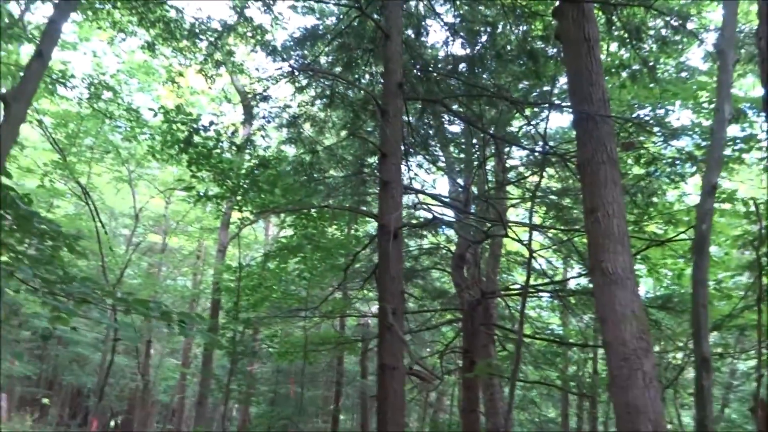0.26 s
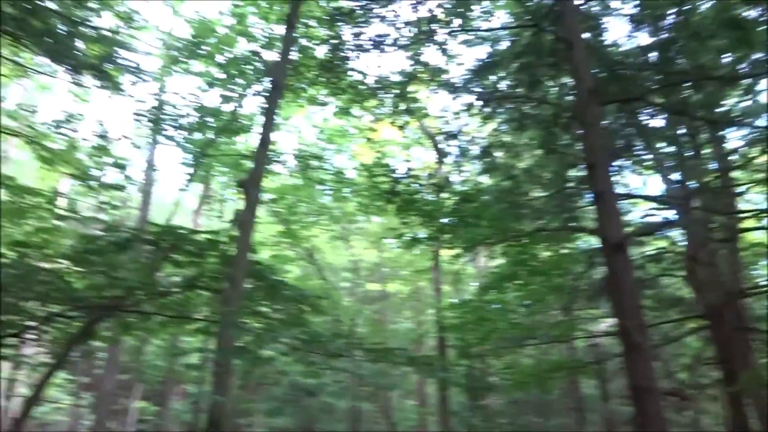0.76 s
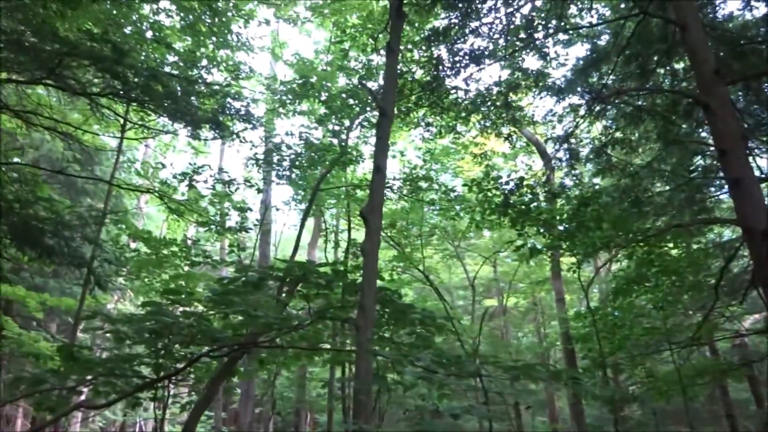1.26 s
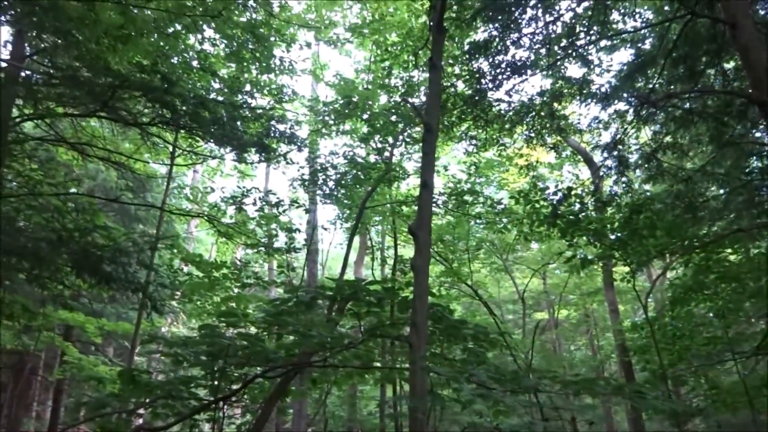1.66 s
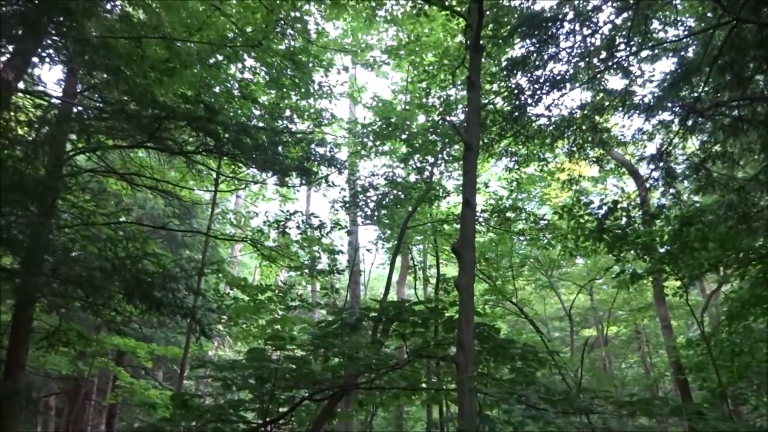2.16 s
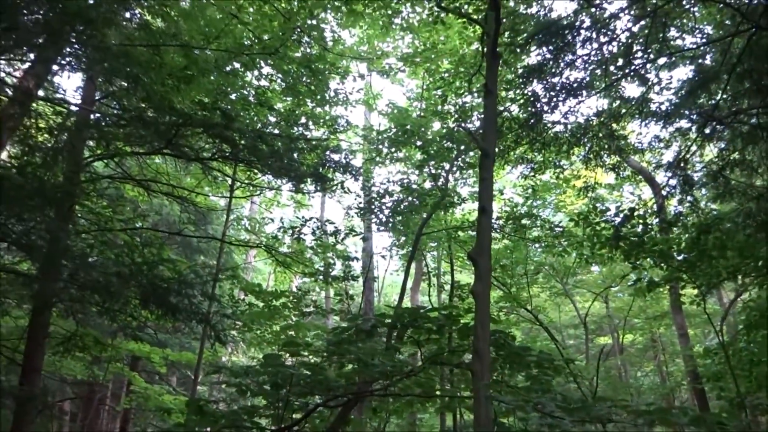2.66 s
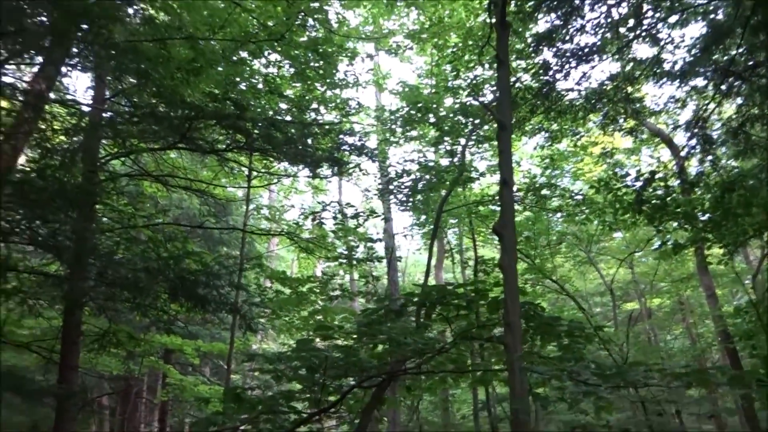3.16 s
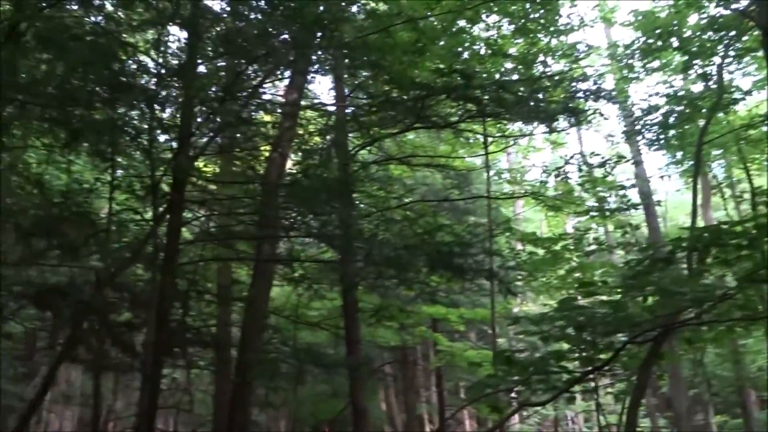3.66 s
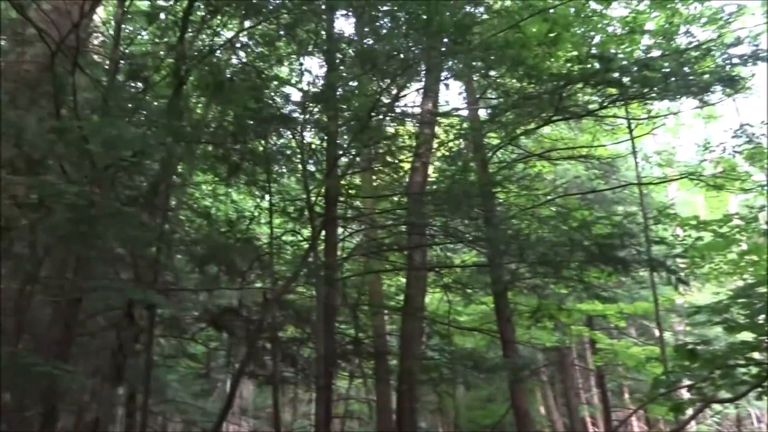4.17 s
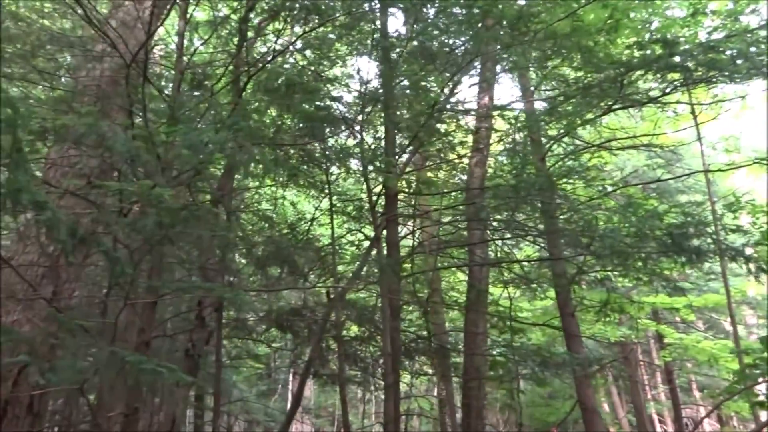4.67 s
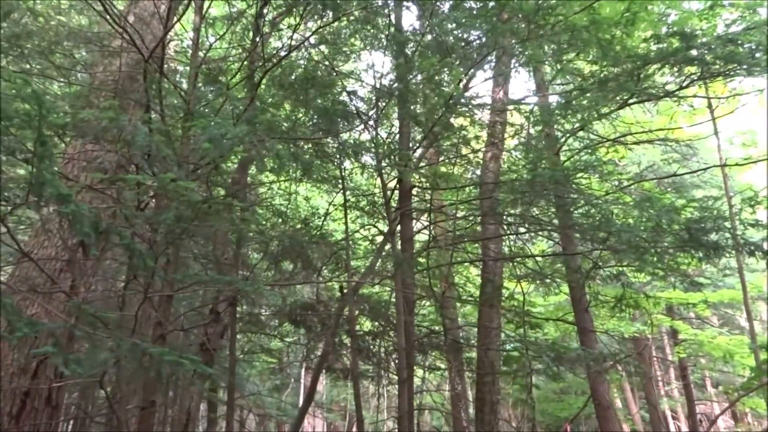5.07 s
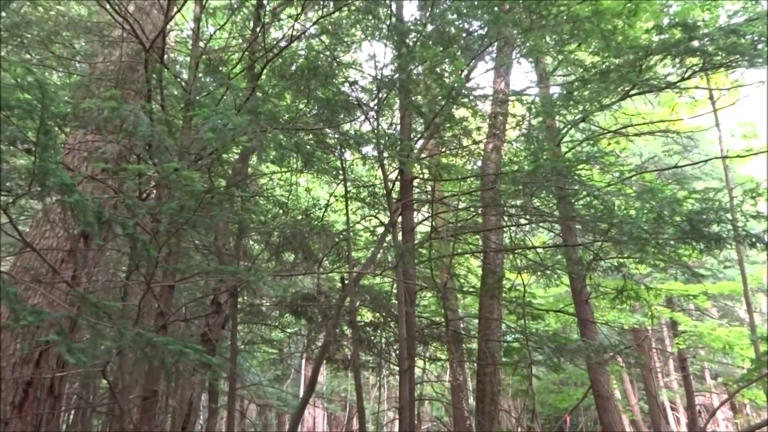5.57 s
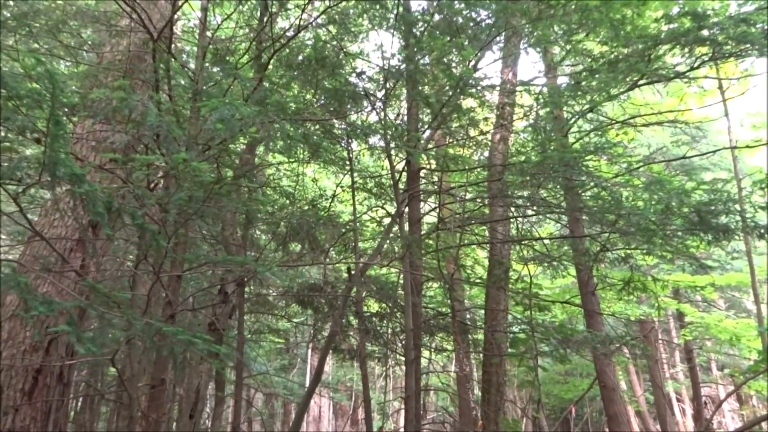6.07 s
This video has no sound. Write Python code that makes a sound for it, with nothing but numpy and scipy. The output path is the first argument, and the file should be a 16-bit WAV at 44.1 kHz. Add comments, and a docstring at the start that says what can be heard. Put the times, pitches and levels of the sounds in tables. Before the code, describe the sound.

In a hushed summer forest, low owl hoots end in a drooping, snarly note, then two harsh falling hawk screams ring through the trees.

```python
"""Owl and hawk in a summer wood

An owl some way off hoots a phrase that ends in a long falling note, then a nearer hawk screams twice.
Each voice is a stack of overtones shaped by a throat, plus breathy noise; trunks and leaves add echoes and a tail.
Under them lie the hush of the wood, a few twig ticks and one soft low thump (shaped noise), a thin far whistle
(pure tones) and faint low calls from deep in the trees (rough overtones and noise)."""
import sys
import numpy as np
from scipy import signal
from scipy.fft import rfft, irfft, next_fast_len
from scipy.io import wavfile
from scipy.ndimage import uniform_filter1d

SR = 44100
rng = np.random.default_rng(int(sys.argv[2]) if len(sys.argv) > 2 else 0)


def int16_out(signal):
    """Quantize to a 16-bit WAV file."""
    q = np.round(np.clip(np.atleast_2d(signal).T, -1, 1) * 32767)
    wavfile.write(sys.argv[1], SR, q.astype(np.int16))


N = 279153
TIME = np.arange(N) / SR  # seconds
SIZE = next_fast_len(N, real=True)
FREQS = np.arange(SIZE // 2 + 1) * SR / SIZE  # Hz

# owl hoots that arch up and down: start_s, rise_s, fall_s, first_pitch_hz, top_pitch_hz, last_pitch_hz,
# level_db (at the top of the arch)
OWL_HOOTS = [(0, 0.042, .012, 508.4, 580, 566, -34), (0.054, .065, .01, 429, 619, 600, -37.5),
             (.125, 0.13, .085, 400.3, 645, 510, -34), (1.033, .155, 0.061, 310, 634, 505, -32.5),
             (1.355, .085, .098, 449.8, 652, 469.3, -33.5), (1.737, .088, .03, 294, 575.7, 548.4, -33.5),
             (1.88, .12, 0.017, 275.5, 581.4, 569.6, -35)]
RISE_POWER, FALL_POWER = 2.3, 2.5  # how flat the top of the arch is
HOOT_DB_PER_OCTAVE = 19  # a hoot is louder the higher it climbs
HOOT_ATTACK_S, HOOT_RELEASE_S = 0.004, 0.009
# the owl's long note, which holds, breaks downward and sinks: time_s, pitch_hz, level_db (before the shift below)
OWL_LAST_NOTE = [(2.014, 623.3, -27.5), (2.1, 658, -32.5), (2.2, 632.6, -31.5), (2.275, 623.7, -23),
                 (2.3, 565.5, -31), (2.38, 527.6, -35), (2.46, 468, -38.5), (2.49, 419, -42),
                 (2.57, 384.7, -35), (2.76, 345, -37.5), (2.79, 320.7, -43), (2.89, 305.6, -42.5)]
LAST_NOTE_SHIFT_DB = -3.5
# how hard the owl presses its voice; the last note opens into a snarl: time_s, overtone_tilt_db_per_octave
OWL_PRESSURE = [(0, -1), (1.9, -2), (2.42, -7), (2.52, -11), (2.62, 7.5), (2.76, 4), (2.86, 11.5)]
# how the owl's throat favours each pitch: frequency_hz, relative_level_db
OWL_RESONANCE = [(120, -52), (250, -10.5), (310, -0.5), (400, 5.5), (620, 4), (750, 10), (950, -4.5),
                 (1040, -25), (1300, -35.5), (1800, -51), (2150, -34), (2400, -26.5), (2700, -62),
                 (4000, -70)]
# single echoes of the owl from trunks and slopes: delay_s, level_db
OWL_REFLECTIONS = [(.03, -16), (.07, -20), (.135, -13), (.215, -15.5), (.35, -19), (.48, -27.5)]

# hawk screams: start_s, length_s, pitch_hz (before flick and sag), level_db (before the shaping below),
# swell_db, catch_depth_db
HAWK_SCREAMS = [(4.951, 0.427, 903.5, -14, 12, 16), (5.634, 0.32, 895.7, -13.5, 4.5, 7.5)]
FLICK_HZ, FLICK_S, SAG_HZ_PER_S = 354.8, 0.011, 440  # the pitch flicks up from below, then sinks steadily
SCREAM_ONSET_DB, SCREAM_ATTACK_S, SCREAM_RELEASE_S = -13.5, 0.028, 0.023
CREST_S, FADE_DB_PER_S = 0.13, 60  # the swell ends this long after the start, then the voice tires
CATCH_S, CATCH_WIDTH_S = 0.176, 0.01  # the voice catches once on the way down
CLEAR_HOARSENESS, HOARSE_PER_S = 0.07, 4.04  # after a rough start: clear until the crest, then ever hoarser
# how the hawk's throat favours each pitch: frequency_hz, relative_level_db
HAWK_RESONANCE = [(850, -62), (1700, -27), (2050, -22), (2550, -15), (2900, 7), (3150, -1.5), (3500, 8.5),
                  (3800, -10), (4200, -24), (5000, -21), (5900, -27.5), (6800, -18), (8500, -23.5),
                  (10000, -36.5), (12500, -36), (15000, -59)]
# colour of the air torn in the hawk's throat: frequency_hz, relative_level_db
HAWK_TORN_AIR = [(300, -82), (1200, -23), (2000, -24.5), (2500, 2), (3150, -5.5), (3900, 0), (4800, -1.5),
                 (5600, -14), (7400, -5), (9000, -15.5), (12500, -28.5), (15000, -40)]
# single echoes of the hawk from trunks and slopes: delay_s, level_db
HAWK_REFLECTIONS = [(0.019, -9), (.078, -10), (.125, -17.5), (.165, -26), (0.203, -45)]

# whistles of a small far bird: start_s, length_s, pitch_hz, level_db
FAR_WHISTLES = [(4.458, 0.054, 3490, -54.5), (4.568, 0.046, 3540, -56)]
# faint low calls from far off: start_s, length_s, pitch_hz, level_db (before the voice and noise are mixed)
DISTANT_CALLS = [(0.319, 0.19, 359.4, -57.5), (4.569, 0.21, 380, -53.5), (4.947, 0.15, 390, -57),
                 (6.067, 0.21, 435, -55.5)]
# what is left of those voices at that distance: frequency_hz, relative_level_db
DISTANT_RESONANCE = [(100, -55), (200, -31), (300, -8), (390, -1.5), (540, -15), (720, -26), (970, -12.5),
                     (1200, -22), (1500, -6), (1750, -16), (2100, -49)]
# twig ticks and one soft low thump: start_s, level_db, centre_hz, width_octaves, time_to_fall_60_db_s
KNOCKS = [(.424, -48, 8185, 0.35, 0.035), (0.79, -37, 1684, 0.2, 0.019), (2.022, -58, 199.3, 1.18, 0.063),
          (3.922, -49.5, 1700, 0.67, .1)]

# colour of the hush of the wood: frequency_hz, relative_level_db_per_hz
HUSH_COLOUR = [(18, -73), (30, -41), (81, -32.5), (126, -25), (307, -22), (379, -12), (874, -6), (970, 0),
               (1330, -16), (1590, -11), (2360, -19), (3070, -16), (3680, -21), (7650, -21), (15500, -25)]
HUSH_DB = -53
# how alike the hush is at both ears: frequency_hz, likeness_0_to_1 (held to 0.99 at most)
HUSH_LIKENESS = [(60, .8), (150, 0.27), (400, 0.067), (1000, 0.05), (2000, 0.057), (5000, 0.27),
                 (12000, 0.99)]
# slow rise and fall of the hush in the middle range: time_s, relative_level_db
HUSH_SWELL = [(0, -1.5), (2.4, -7.5), (3.7, 0.5), (4.7, -1.5), (5.4, -5), (6.3, 1.5)]
TOP_HZ = 15750


def owl():
    """Almost pure hoots; at low pitch the second and third harmonics fall into the throat resonance."""
    pitch, loud = contour([arch(*row) for row in OWL_HOOTS] + [last_note()])
    shaky_pitch = pitch * (1 + 0.0047 * wander(100))
    hoot = voice(shaky_pitch, OWL_RESONANCE, curve(OWL_PRESSURE), flutter_db=5.0, count=8)
    hoot = hoot * undb(1.3 * wander(70))
    # the voice is husky in its low slides and purer at the top
    husky = np.clip(400 / pitch, 0, 1) ** 3
    air = undb(-8.5) * husky * noise(undb(at_hz(OWL_RESONANCE, FREQS)))
    return wood(loud * (hoot + air), OWL_REFLECTIONS, wet_db=-7.5, t60=1.74, treble_t60=0.86,
                build_s=0.0079, side_db=-8.5, lead_ms=0.07, pan_db=1.0)


def arch(start, rise, fall, first_hz, top_hz, last_hz, db):
    """One hoot slides up to a rounded top and drops off; loudness follows pitch."""
    age = TIME - start
    climb_left = np.clip(1 - age / rise, 0, 1) ** RISE_POWER
    drop_done = np.clip((age - rise) / fall, 0, 1) ** FALL_POWER
    # octaves below the top
    below = np.log2(top_hz / first_hz) * climb_left + np.log2(top_hz / last_hz) * drop_done
    loud = undb(db - HOOT_DB_PER_OCTAVE * below)
    loud = loud * gate(age, rise + fall, HOOT_ATTACK_S, HOOT_RELEASE_S)
    return start, top_hz / 2 ** below, loud


def last_note():
    """The long note holds, then sinks by about an octave."""
    rows = np.array(OWL_LAST_NOTE)
    start, end = rows[0, 0], rows[-1, 0]
    loud = undb(curve(rows[:, [0, 2]]) + LAST_NOTE_SHIFT_DB)
    loud = loud * gate(TIME - start, end - start, attack=0.0056, release=0.028)
    return start, curve(rows[:, :2]), loud


def hawk():
    """A harsh upward flick and a slow fall; the fourth harmonic rings, and the voice turns hoarse as it sinks."""
    pitch, loud, hoarse = contour([scream(*row) for row in HAWK_SCREAMS])
    # uneven cycles blur the high harmonics first, then break up the whole voice
    jitter = 0.00397 * wander(350) + 0.022 * hoarse ** 2 * wander(700)
    cry = voice(pitch * (1 + jitter), HAWK_RESONANCE, tilt_db=0.0, flutter_db=2.5, count=16)
    # the air tears in coarse, uneven spurts
    spurts = undb(1.9 * wander(300))
    rasp = undb(-5.5) * hoarse * noise(undb(at_hz(HAWK_TORN_AIR, FREQS))) * spurts
    return wood(loud * (cry + rasp), HAWK_REFLECTIONS, wet_db=-6.0, t60=0.75, treble_t60=0.81,
                build_s=0.07, side_db=-10.5, lead_ms=0, pan_db=1.5)


def scream(start, length, hz, db, swell_db, catch_db):
    """Pitch, loudness and hoarseness of one scream: a rough start, a clear swell, a catch, and tiring."""
    age = np.clip(TIME - start, 0, length)
    opening = np.clip(1 - age / SCREAM_ATTACK_S, 0, 1)
    early, late = np.maximum(1 - age / CREST_S, 0), np.maximum(age - CREST_S, 0)
    catch = np.exp(-((age - CATCH_S) / CATCH_WIDTH_S) ** 2)
    pitch = hz - FLICK_HZ * np.exp(-age / FLICK_S) - SAG_HZ_PER_S * age
    loud = undb(db + SCREAM_ONSET_DB * opening - swell_db * early - FADE_DB_PER_S * late - catch_db * catch)
    # age stops at the length, so the gate closes the scream for good
    loud = loud * gate(age, length, attack=0.0013, release=SCREAM_RELEASE_S)
    hoarse = np.clip(CLEAR_HOARSENESS + opening + HOARSE_PER_S * late, 0, 1)
    return start, pitch, loud, hoarse


def small_bird():
    """Two thin level whistles, pure tones mostly heard through the trees."""
    tone = 0
    for start, length, hz, db in FAR_WHISTLES:
        whistle = unit(np.sin(2 * np.pi * hz * TIME))
        tone = tone + undb(db) * gate(TIME - start, length, attack=0.021, release=0.026) * whistle
    return wood(tone, [], wet_db=4.5, t60=0.76, treble_t60=0.75,
                build_s=0.026, side_db=-12, lead_ms=0, pan_db=-2)


def far_calls():
    """Low, rough calls from deep in the wood, blurred by the trees."""
    notes = []
    for start, length, hz, db in DISTANT_CALLS:
        loud = undb(db) * gate(TIME - start, length, attack=0.031, release=0.025)
        notes.append((start, np.full(N, float(hz)), loud))
    pitch, loud = contour(notes)
    shaky_pitch = pitch * (1 + 0.0395 * wander(90))
    call = undb(-2) * voice(shaky_pitch, DISTANT_RESONANCE, tilt_db=-3.5, flutter_db=10, count=4)
    rough = undb(1) * noise(undb(at_hz(DISTANT_RESONANCE, FREQS)))
    return wood(loud * (call + rough), [], wet_db=1.5, t60=0.94, treble_t60=0.8,
                build_s=0.028, side_db=-5.5, lead_ms=0, pan_db=0)


def knocks():
    """Short dry ticks and a soft thump, each a band of noise that dies quickly."""
    out = 0
    for start, db, hz, octaves, t60 in KNOCKS:
        age = TIME - start
        level = np.clip(age / 0.001, 0, 1) * undb(db - 60 * np.abs(age) / t60)
        out = out + level * noise(bell(hz, octaves))
    return out


def hush():
    """Shaped noise that slowly rises and falls in the middle range; the treble is an even hiss."""
    colour = undb(at_hz(HUSH_COLOUR, FREQS))
    alike = np.clip(at_hz(HUSH_LIKENESS, FREQS), 0, 0.99)
    # slow swell with a small quick flutter
    swell = undb(curve(HUSH_SWELL) + 0.5 * wander(3.73) + 0.88 * wander(41))
    middle = bell(690, 0.59)
    parts = []
    # the shared part (mid) and the part that differs between the ears (side)
    for share in (1 + alike, 1 - alike):
        spectrum = rfft(rng.standard_normal(SIZE)) * colour * np.sqrt(share / (1 + alike))
        swelling = swell * irfft(spectrum * middle, SIZE)[:N]
        steady = irfft(spectrum * (1 - middle), SIZE)[:N]
        parts.append(swelling + steady)
    mid, side = parts
    return undb(HUSH_DB) * np.array([mid + side, mid - side]) / np.std(mid)


def wood(x, echoes, wet_db, t60, treble_t60, build_s, side_db, lead_ms, pan_db):
    """Direct sound, single echoes and a scattered tail whose treble fades at its own pace."""
    t = TIME[:2 * SR]
    split = signal.butter(3, 4500, fs=SR, output="sos")
    # the scatterers are of very unequal size
    scatter = rng.standard_normal((2, len(t))) * undb(3.2 * rng.standard_normal(len(t)))
    low = signal.sosfiltfilt(split, scatter)
    # near leaves spray the treble at once; trunks answer later
    trunks = low * np.exp(-np.log(1000) * t / t60) * (1 - np.exp(-(t / build_s) ** 2))
    leaves = (scatter - low) * np.exp(-np.log(1000) * t / treble_t60) * undb(-3.0)
    tail = trunks + leaves
    mid, side = undb(wet_db) * tail / np.sqrt(np.sum(tail[0] ** 2))
    for delay, db in echoes:
        mid[int(abs(delay) * SR)] += undb(db)
    # long waves bend round the trunks and do not come back
    bend = signal.butter(4, 390, "high", fs=SR, output="sos")
    ears = []
    for sign in (1, -1):
        answer = signal.sosfilt(bend, mid + sign * undb(side_db) * side)
        ears.append(x + signal.fftconvolve(x, answer)[:N])
    left, right = ears
    # a bird to the left reaches the right ear later
    right = np.pad(right, (int(abs(lead_ms) * SR / 1000), 0))[:N]
    return np.array([left * undb(pan_db / 2), right * undb(-pan_db / 2)])


def voice(pitch, throat, tilt_db, flutter_db, count):
    """Overtones of a bird's voice box, each shaped by the throat and fluttering alone; rms about 1."""
    phase = 2 * np.pi * np.cumsum(pitch) / SR
    stack, power = 0, 0
    for k in range(1, count + 1):
        gain = undb(at_hz(throat, k * pitch) + tilt_db * np.log2(k) + flutter_db * wander(30))
        stack = stack + gain * np.sin(k * phase)
        power = power + gain ** 2 / 2
    return stack / np.sqrt(power)


def contour(notes):
    """Join (start, control, control, ..) notes: each holds the controls until the next one starts."""
    controls = np.array(notes[0][1:])
    for start, *note in notes[1:]:
        controls = np.where(TIME >= start, note, controls)
    return uniform_filter1d(controls, size=200)  # rounds off the joins


def gate(age, length, attack, release):
    """Open over the attack, hold, and close over the release."""
    return np.clip(age / attack, 0, 1) * np.clip((length - age) / release, 0, 1)


def curve(table):
    """Join (s, value) points by straight lines."""
    return np.interp(TIME, *np.transpose(table))


def wander(rate):
    """Random drift of rms 1: straight lines between new random values, rate times a second."""
    steps = rng.standard_normal(16384)
    return unit(np.interp(TIME * rate, np.arange(len(steps)), steps))


def noise(gain):
    """Noise of rms 1 with the given relative gain at each frequency."""
    return unit(irfft(rfft(rng.standard_normal(SIZE)) * gain, SIZE)[:N])


def bell(hz, octaves):
    """A rounded band on the log-frequency axis."""
    return np.exp(-0.5 * (np.log2(np.maximum(FREQS, 1) / hz) / octaves) ** 2)


def at_hz(table, hz):
    """Read (Hz, value) points on a log-frequency axis."""
    f, value = np.transpose(table)
    return np.interp(np.log(np.maximum(hz, 1)), np.log(f), value)


def undb(db):
    """Decibels to gain."""
    return 10 ** (np.asarray(db) / 20)


def unit(x):
    """Scale to rms 1."""
    return x / np.sqrt(np.mean(x ** 2))


def scene():
    """The birds over the hush of the wood."""
    return owl() + hawk() + small_bird() + far_calls() + knocks() + hush()


def record(dry):
    """A steep filter cuts the top of the treble."""
    return signal.sosfilt(signal.ellip(10, 0.1, 80, TOP_HZ, fs=SR, output="sos"), dry)


dry = scene()
out = record(dry)
int16_out(out)
```